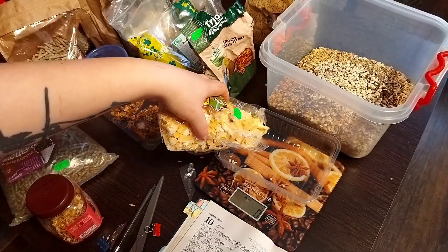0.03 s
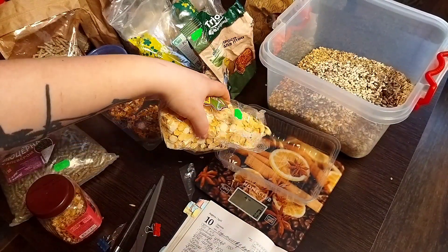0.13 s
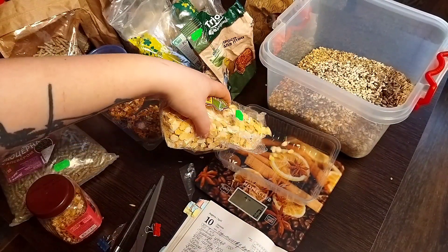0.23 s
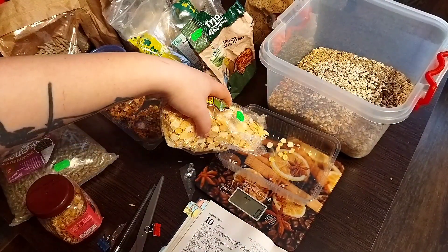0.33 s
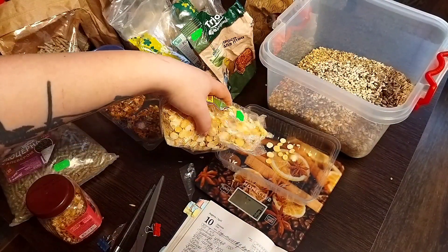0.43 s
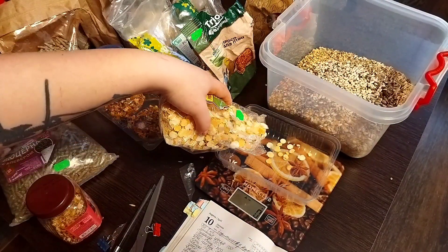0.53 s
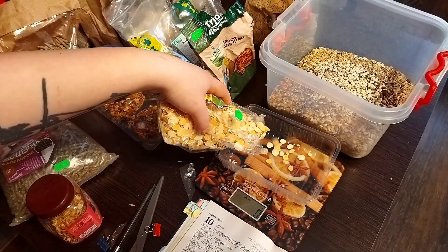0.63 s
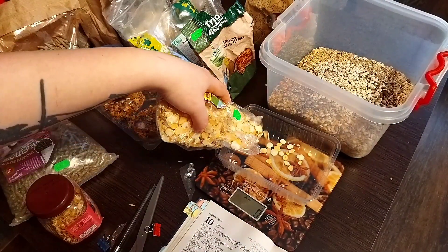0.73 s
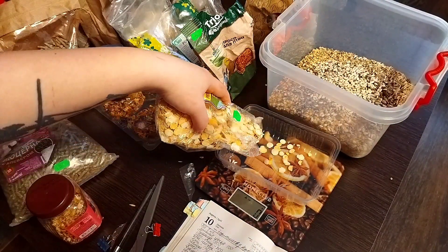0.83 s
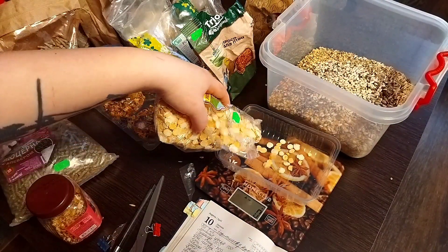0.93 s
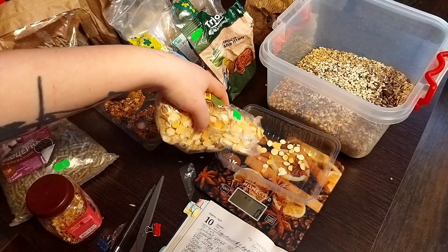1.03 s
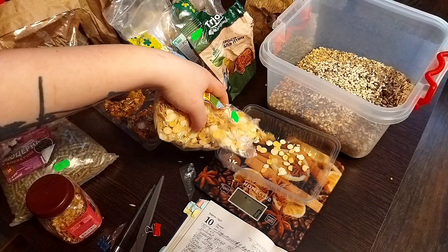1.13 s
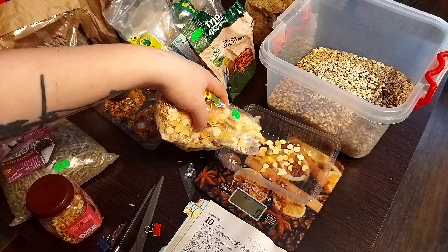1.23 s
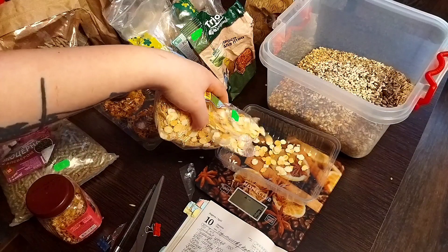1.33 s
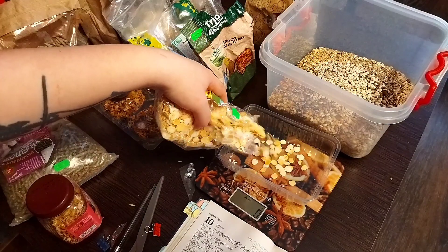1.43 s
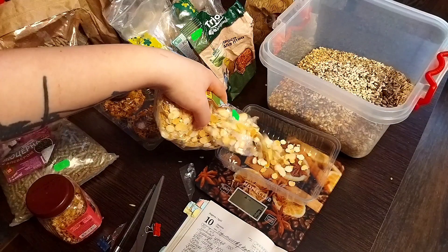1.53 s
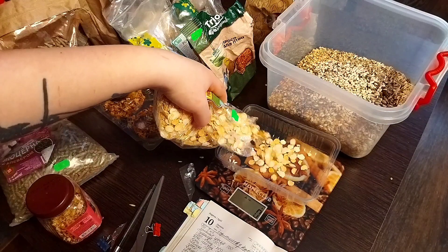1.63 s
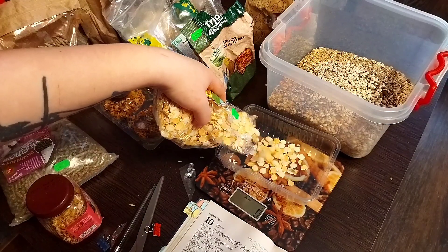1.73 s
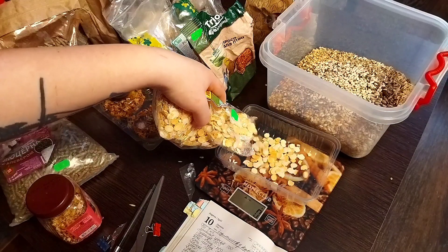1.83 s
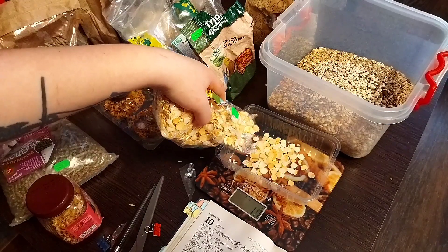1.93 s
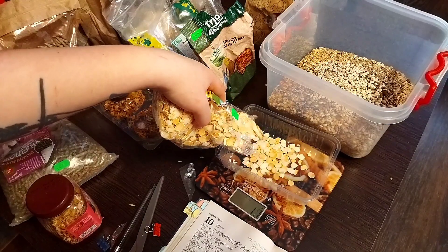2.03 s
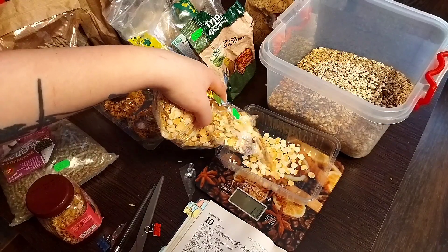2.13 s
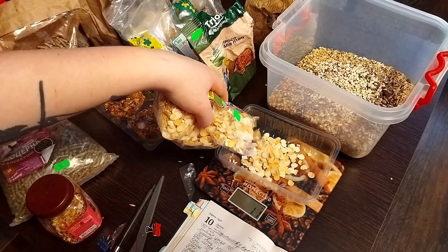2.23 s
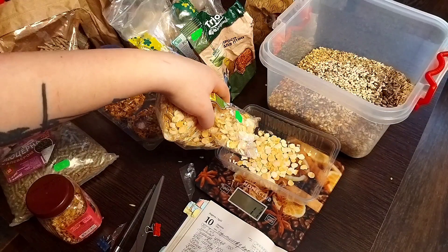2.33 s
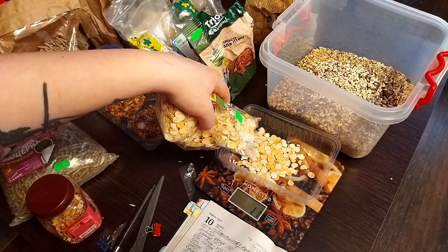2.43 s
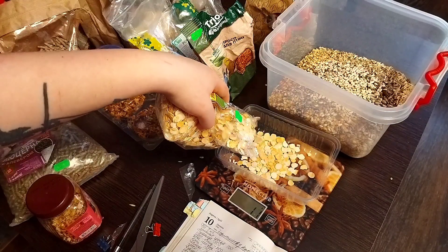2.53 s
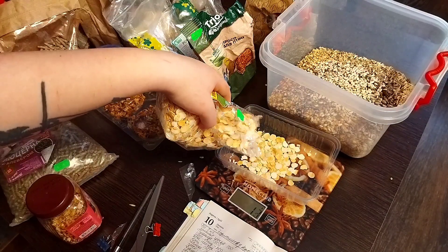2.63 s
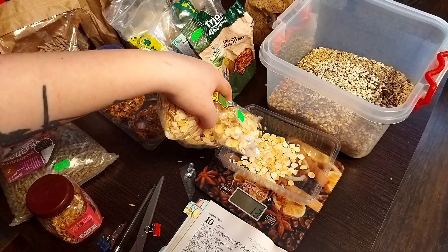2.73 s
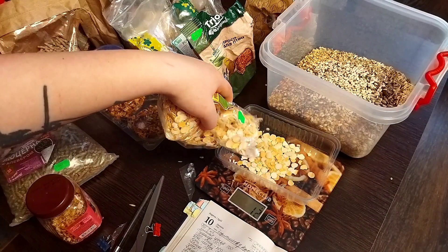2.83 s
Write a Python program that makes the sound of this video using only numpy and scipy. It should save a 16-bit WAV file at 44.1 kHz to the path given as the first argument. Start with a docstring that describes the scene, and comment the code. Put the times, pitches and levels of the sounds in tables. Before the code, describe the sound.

A plastic bag snaps and crinkles in bursts while dry flakes tick into a lightly ringing tray, with a few soft hand bumps; the crackling swells, then fades. Heard close up in a small room with faint hiss.

```python
"""Sharp snaps over a bed of fine crinkles: dry flakes are shaken out of a crinkly plastic bag.
They patter into a thin plastic tray on a kitchen scale and make it ring; the hand gives a few soft bumps.
Snaps, crinkles and flakes are bursts of noise in five ranges; the tray is a set of decaying sines, the bumps
are filtered pushes, and the shifting load and the floor are shaped noise.
Heard from close by through two microphone ports in a small, quiet room."""
import sys
import numpy as np
from scipy import signal
from scipy.fft import rfft, irfft
from scipy.io import wavfile
from scipy.ndimage import uniform_filter1d

SR = 44100
rng = np.random.default_rng(int(sys.argv[2]) if len(sys.argv) > 2 else 0)


def wav_record(signal):
    """Record a signal, one row per channel, as 16-bit PCM in the file named by sys.argv[1]."""
    frames = np.transpose(np.atleast_2d(signal))
    bounded = np.clip(frames, -1, 1)
    # unit amplitude maps onto the largest positive 16-bit level
    quanta = np.round(bounded * 32767).astype(np.int16)
    wavfile.write(sys.argv[1], SR, quanta)


N = 127890
T = np.arange(N) / SR


def from_db(db):
    """Decibels to amplitude gain."""
    return 10 ** (np.asarray(db) / 20)


def rms_one(x):
    """Scale to an rms of one."""
    return x / np.sqrt(np.mean(x ** 2) + 1e-20)


def at_hz(points, hz):
    """Read a table on a log-frequency axis."""
    f, v = np.transpose(points)
    return np.interp(np.log(np.maximum(hz, 1)), np.log(f), v)


def level_curve(points):
    """Level in dB at every sample, straight lines between the points."""
    return np.interp(T, *np.transpose(points))


def bins(size):
    """Frequencies of a spectrum of this many samples, kept above zero."""
    return np.maximum(np.arange(size // 2 + 1) * SR / size, 1)


def causal(gain):
    """Minimum-phase response with these gains: the energy comes as early as it can."""
    cepstrum = irfft(np.log(gain + 1e-6))
    half = len(cepstrum) // 2
    cepstrum[1:half] *= 2
    cepstrum[half + 1:] = 0
    return np.exp(rfft(cepstrum))


def through(x, response):
    """Convolve and keep the length."""
    return signal.fftconvolve(np.atleast_2d(x), response, axes=-1)[:, :N]


def add(out, s, sound):
    """Mix a sound in at a time in seconds."""
    i = max(int(s * SR), 0)
    part = out[:, i:i + sound.shape[-1]]
    part += sound[..., :part.shape[-1]]


# the five ranges of a crack, low to high: low_edge_hz, high_edge_hz, decay_s (time constant), snap_gain_db
CRACK_RANGES = [(53, 998, 0.00095, -1), (936, 1794, .0012, 0), (1730, 2980, 0.00063, -.5),
                (3050, 6560, 0.00095, -0.5), (5560, 15600, 0.0015, -0.5)]
# colour of a crack, before each range is set to its level: freq_hz, gain_db
CRACK_TINT = [(70, -28), (200, -21.5), (280, -11), (580, -8), (770, 3), (1000, -0.5), (1350, 3),
              (1850, -1.5), (2200, 4), (2900, 0.5), (3900, 4.5), (4700, 5), (5500, -6), (7500, -7),
              (10000, -0.5), (15500, -3)]
# how unlike the two ports hear a crack, one share per range, low to high: unlike_share
RANGE_UNLIKE = (0.44, 0.64, 0.55, 0.71, 0.94)
PORT_LAG_S = 0.00005  # the left port hears later
RISE_S, FLUTTER_S = 0.00012, 0.0068  # onset of the small slips; decay time constant of the flutter
FIRST_SLIP_DB = 13.5  # height of the first slip against the noise
CRACK_S = 0.003  # a level is the rms of a crack's energy spread over this time
CRACK_GRIT = 0.85  # unevenness of the tiny slips: 0 smooth, 1 spiky


def cracks(levels_db, flutter_db, size=1024):
    """One stereo crack per row of range levels: a first sharp slip, a run of smaller ones, a faint flutter."""
    count = len(levels_db)
    t, hz, out = np.arange(size) / SR, bins(size), 0
    # three noises per range: one that both ports share, then one for each port alone
    noise = rng.standard_normal((count, len(CRACK_RANGES), 3, size))
    noise *= np.abs(rng.standard_normal((count, 1, 1, size))) ** CRACK_GRIT
    own_colour = facets(count, hz)
    rise = 1 - np.exp(-(t / RISE_S) ** 2)
    flutter = from_db(flutter_db) * np.exp(-t / FLUTTER_S)
    for k, (low, high, decay_s, _) in enumerate(CRACK_RANGES):
        slips = noise[:, k] * rise * (np.exp(-t / decay_s) + flutter)
        slips[:, 0, int(RISE_S * SR)] += from_db(FIRST_SLIP_DB)
        burst = rfft(slips) * own_colour
        unlike = RANGE_UNLIKE[k]
        pair = np.sqrt(1 - unlike ** 2) * burst[:, :1] + unlike * burst[:, 1:]
        pair[:, 0] *= np.exp(-2j * np.pi * hz * PORT_LAG_S)
        band = ((1 + (low / hz) ** 12) * (1 + (hz / high) ** 12)) ** -0.5
        wave = irfft(pair * causal(band * from_db(at_hz(CRACK_TINT, hz))))
        energy = np.mean(np.sum(wave ** 2, axis=2), axis=1)
        level = np.sqrt(energy / (CRACK_S * SR))
        out = out + wave * (from_db(levels_db[:, k]) / level)[:, None, None]
    return out


FACET_LOW_HZ, FACET_HIGH_HZ = 1277, 13800  # span of the pitches that a crease or flake has of its own
FACET_Q, FACET_DB = 9.6, 2


def facets(number, hz, count=4):
    """Short resonances at random pitches, a new set for each crack."""
    own_hz = FACET_LOW_HZ * (FACET_HIGH_HZ / FACET_LOW_HZ) ** rng.random((number, count, 1))
    resonances = 1 / (1 + 1j * FACET_Q * (hz / own_hz - own_hz / hz))
    return 1 + from_db(FACET_DB) * np.sum(resonances, axis=1, keepdims=True)


# the film buckles or a flake hits hard: start_s, five level_db (range by range, low to high, before
# snap_gain_db), left_minus_right_db
SNAP_EVENTS = [(0.1592, -52, -55, -48, -50, -48, -1), (0.22, -33.5, -29, -29, -22, -34, -2),
               (0.2323, -46, -41, -41, -31, -38, -2), (0.247, -45, -31.5, -31, -35, -27, 7.5),
               (0.2649, -50, -42, -44.5, -28.5, -36, -8), (0.2705, -36, -30.5, -40, -22.0, -27, -5),
               (0.2767, -38, -28.5, -28, -25, -23, 1), (0.281, -34.5, -25, -28.5, -23, -24, -2),
               (0.2852, -35, -27, -31, -20, -23, 5.5), (0.316, -40, -25.5, -27.5, -21.5, -24.5, 1),
               (0.3356, -43, -29, -31, -21, -21.5, -2), (0.339, -35.0, -28, -26, -28, -25, -1),
               (0.3563, -50, -34, -37, -26.5, -31, -1), (0.4108, -49, -38, -45, -33, -35, -3),
               (0.4254, -32, -24.5, -26.5, -21.5, -23.5, -0.5), (0.4418, -33.5, -31, -30, -26, -19, -1),
               (0.516, -43, -38, -33.0, -27.5, -38, 0.5), (0.5229, -56, -38.5, -31, -30, -34, -2),
               (0.5494, -60, -39.5, -43, -33.5, -31, 6), (0.5531, -48, -47, -47, -26.5, -25, 0.5),
               (0.5808, -61, -47, -36.5, -39, -35.0, 2), (0.6273, -51, -37.5, -38.5, -25.5, -29.5, 1.5),
               (0.6597, -37, -34.5, -41, -31.5, -32, -1.5), (0.664, -48, -34, -31.5, -44, -27, 2),
               (0.683, -49, -30.5, -31.5, -25.5, -23, 0), (0.7406, -57.5, -48, -31, -30, -39, 2),
               (0.7497, -53, -51, -50, -31, -33.5, -4), (0.7773, -29.5, -24.5, -31, -24, -27.5, 1.5),
               (0.8428, -54.5, -42.5, -42, -33, -35, -4), (0.8595, -37.5, -36, -38, -25.5, -32.5, 1),
               (0.8689, -60, -44, -40.5, -34, -26, 0), (0.8866, -38, -32, -28.5, -18, -20, -2.5),
               (0.8935, -55.0, -33, -31, -22.5, -25, 0.5), (0.8961, -40, -32.5, -31, -26, -31, 5),
               (0.9675, -34, -33.5, -35.5, -21, -25.5, -2.5), (1.0004, -45, -33.0, -38, -37, -39, 1),
               (1.0037, -35.5, -37, -23.5, -27, -24.5, 0.5), (1.019, -30.5, -31.0, -24, -22, -25, 1.5),
               (1.0252, -33, -41, -25, -26.5, -23, 0), (1.1108, -51, -39, -36.5, -28.5, -29.5, -2),
               (1.2439, -54, -32, -28, -26, -31.5, 1), (1.2557, -33, -31.5, -38, -19.5, -29, 2),
               (1.2798, -51, -46.0, -47, -26, -35, -4), (1.2876, -40.0, -32.5, -27, -28.0, -25, 1),
               (1.2908, -42, -37, -24.5, -24.5, -21.5, -1), (1.2955, -32.5, -28.5, -22, -19.5, -23, 2),
               (1.3028, -48, -27, -24.5, -19.5, -27, -4), (1.3149, -53, -33, -31.5, -22.5, -37, 5),
               (1.3241, -38, -34, -36.5, -23, -36, 0), (1.3427, -48, -49, -41, -24.0, -29, 2),
               (1.4559, -36, -32.5, -24, -24.5, -25.5, 1), (1.4899, -42.5, -33, -37, -27, -19, 1.5),
               (1.5007, -42, -27, -29, -21.5, -28, -2), (1.5503, -48, -32.5, -33, -25, -26.0, -3),
               (1.555, -49.0, -29.5, -32.0, -19.5, -22, 5.5), (1.6241, -48.5, -55, -47, -19.5, -32, 0),
               (1.6583, -34, -29.5, -39, -21.5, -29, 1), (1.7044, -35.5, -25.5, -31, -31, -30, -3),
               (1.7128, -37.0, -37, -27, -22, -31, 0), (1.9106, -54, -33.5, -28, -29, -31.0, 0),
               (1.9431, -46, -35, -27.5, -28, -26.5, -2), (2.0257, -31.5, -31.5, -28.5, -24.5, -25, 1),
               (2.0687, -41, -35.5, -30, -32, -26.0, 4), (2.1153, -36, -40, -27, -29.5, -30, -1),
               (2.1226, -58, -41, -32, -30.0, -27.5, 1), (2.171, -41.5, -60, -45, -31, -38, 2),
               (2.2298, -55, -32, -34, -31.5, -29, 2.5), (2.3658, -33, -32, -26.5, -36, -27.5, 0.5),
               (2.516, -37.5, -38, -35.5, -31.5, -32.5, -1.5), (2.6019, -45, -45, -40, -35.5, -32.5, -2),
               (2.6063, -40.5, -37, -36, -24.5, -31, 1.5), (2.706, -46.0, -42, -46.0, -37, -41, 1),
               (2.7327, -50, -38, -51, -35.5, -34.5, 3), (2.8652, -69, -69, -45, -36, -37, 3.5)]


def bag_snaps():
    """The loud single cracks of buckling film and hard-hitting flakes, each leaning to its own side."""
    rows, out = np.array(SNAP_EVENTS), np.zeros((2, N))
    levels_db = rows[:, 1:-1] + np.array(CRACK_RANGES)[:, -1]
    for (s, *_, pan_db), wave in zip(rows, cracks(levels_db, flutter_db=-14)):
        add(out, s - RISE_S, wave * from_db([[pan_db / 2], [-pan_db / 2]]))
    return out


RATE_FOLLOWS = 0.4  # share of a crackle's level swing in dB that its rate follows


def crackle(curve, per_s, spread_db, ranges_db, colour_spread_db, flutter_db, count=80):
    """Tiny cracks of uneven size and colour under a level curve: they come faster when it is louder."""
    colours_db = np.array(ranges_db) + colour_spread_db * rng.standard_normal((count, len(CRACK_RANGES)))
    shapes = cracks(colours_db, flutter_db)
    shapes /= np.sqrt(np.mean(np.sum(shapes ** 2, axis=-1)))
    level_db = level_curve(curve)
    rate = per_s * from_db(RATE_FOLLOWS * (level_db - level_db.mean()))
    sizes = from_db(spread_db * np.minimum(rng.exponential(1, N), 4))
    clicks = (rng.random(N) < rate / SR) * sizes
    # even out the power over 50 ms, so that the curve sets the level
    clicks /= np.sqrt(np.abs(uniform_filter1d(clicks ** 2, size=2205)) + 1e-6)
    clicks *= from_db(level_db) * rng.choice([-1, 1], N)
    dealt, out = rng.integers(0, count, N), np.zeros((2, N))
    for i in np.flatnonzero(clicks):
        add(out, i / SR, clicks[i] * shapes[dealt[i]])
    return out


# fine crinkling as the bag is shaken: time_s, level_db
CRINKLE_LEVEL = [(0, -49.5), (.04, -60.5), (.11, -50), (.21, -63.5), (.28, -33), (.36, -38.5), (.47, -38),
                 (.55, -40), (.61, -53.5), (.67, -34.5), (.73, -45.5), (.83, -47), (.90, -32.5),
                 (.94, -36.5), (1.02, -38), (1.08, -43.5), (1.115, -34), (1.15, -44), (1.23, -46),
                 (1.31, -25.5), (1.37, -34), (1.44, -49.5), (1.50, -33), (1.54, -34), (1.60, -31.5),
                 (1.66, -23.5), (1.74, -32.5), (1.82, -30.5), (1.90, -38), (1.96, -33.5), (2.01, -39),
                 (2.12, -40.5), (2.22, -50.5), (2.24, -29), (2.33, -32.5), (2.41, -33), (2.45, -48),
                 (2.53, -40), (2.59, -61), (2.63, -42), (2.67, -48), (2.71, -43), (2.78, -51), (2.9, -50.5)]
# balance of a crinkle over the five ranges, low to high: level_db
CRINKLE_BALANCE = (-16, -14, -7, -2, -3)


def bag_crinkle():
    """Many small creases of the shaken film give way in a dense bed of tiny cracks."""
    return crackle(CRINKLE_LEVEL, per_s=1200, spread_db=3.5, ranges_db=CRINKLE_BALANCE,
                   colour_spread_db=3.5, flutter_db=-12)


# flakes landing in the tray: time_s, level_db
FLAKE_LEVEL = [(0, -58.5), (.2, -64), (.35, -43.5), (.6, -48.5), (1.05, -48), (1.2, -51), (1.35, -38),
               (1.45, -44.5), (1.7, -40), (1.95, -40.5), (2.2, -61.5), (2.38, -48.5), (2.55, -51.5),
               (2.9, -55.5)]
# balance of a flake's tick over the five ranges, low to high: level_db
FLAKE_BALANCE = (-10.5, -7.5, -4, -0.5, -8)


def flake_patter():
    """Flakes strike the tray in sparser ticks, more varied in size and colour than the crinkles."""
    return crackle(FLAKE_LEVEL, per_s=240, spread_db=4.5, ranges_db=FLAKE_BALANCE,
                   colour_spread_db=7.5, flutter_db=-20)


# modes of the thin plastic tray: pitch_hz, level_db, t60_s
TRAY_MODES = [(482, -50, .16), (750, -55, .07), (840, -57, .08), (1190, -57, .07), (1315, -56, .1),
              (1655, -53, .06), (2120, -54, .04), (3215, -56, .06), (3445, -54, .06)]


def tray(x):
    """The thin walls ring briefly with every tick: each mode is a dying sine, its phase new at each port."""
    t = T[:SR // 4]
    rings = 0
    for hz, db, t60 in TRAY_MODES:
        sine = np.sin(2 * np.pi * (hz * t + rng.random((2, 1)) / 2))
        rings = rings + from_db(db - 60 * t / t60) * sine
    return through(x, rings)


# soft bumps of hand and bag: start_s, peak_db, pitch_hz, width_octaves
BUMP_EVENTS = [(.282, -38.5, 472, 0.17), (.430, -39.5, 423, 0.36), (.491, -37, 290, 0.68),
               (.887, -51.5, 130, 1.1), (1.410, -43, 335, 0.84), (1.498, -42, 347, 0.45),
               (1.566, -39, 350, 0.58), (2.772, -44.5, 335, 0.51)]
BUMP_S = 0.00078  # length of the push


def bumps(size=4096):
    """Dull, quickly damped knocks: a short push through one broad resonance."""
    out, t = np.zeros((2, N)), T[:size]
    push = np.sin(np.pi * np.minimum(t / BUMP_S, 1))
    for s, db, hz, octaves in BUMP_EVENTS:
        resonance = 1 / (1 + (np.log2(bins(size) / hz) / octaves) ** 4)
        wave = irfft(rfft(push) * causal(resonance))
        add(out, s - BUMP_S, from_db(db) * wave / np.abs(wave).max())
    return out


ROOM_LIKENESS_HZ = 645  # above this the two ports hear mostly unrelated noise


def stereo_noise(size):
    """Spectra of diffuse noise: alike at both ports in the bass, unrelated in the treble."""
    mid, side = rfft(rng.standard_normal((2, size)))
    alike = 1 / (1 + (bins(size) / ROOM_LIKENESS_HZ) ** 2)
    return np.sqrt(1 + alike) * mid + np.sqrt(1 - alike) * side * [[1], [-1]]


# dull rustle of the load shifting in the bag: time_s, level_db
LOAD_LEVEL = [(0, -60), (.7, -72), (1.1, -56), (1.22, -57.5), (1.55, -51.5), (1.75, -61.5), (2.1, -61.5),
              (2.6, -68), (2.8, -57), (2.9, -79)]
# its colour: freq_hz, relative_db
LOAD_COLOUR = [(60, -47), (150, -24.5), (220, -9), (280, 2.5), (370, 0.5), (600, 0), (1500, -33),
               (5000, -58)]


def shifting_load():
    """The flakes slide as a mass against the palm: dull noise under a level curve."""
    rustle = rms_one(irfft(stereo_noise(N) * from_db(at_hz(LOAD_COLOUR, bins(N)))))
    return rustle * from_db(level_curve(LOAD_LEVEL))


# reverberation time of the small room: freq_hz, t60_s
ROOM_DECAY = [(200, 0.6), (1000, 0.5), (4000, 0.35), (9000, 0.12), (16000, 0.3)]
# share of the reverberation: freq_hz, level_db
ROOM_SHARE = [(200, -6), (1000, -3), (4000, -6.5), (9000, -12.5), (16000, -8.5)]
ROOM_BUILD_S = 0.00063


def room(x, size=22050):
    """A dense noise tail that builds within milliseconds and dies at its own pace in each band."""
    t, hz, noise, tail = T[:size], bins(size), stereo_noise(size), 0
    centres = np.array(ROOM_DECAY)[:, 0]
    for (_, t60), weights in zip(ROOM_DECAY, np.eye(len(centres))):
        shape = (1 - np.exp(-(t / ROOM_BUILD_S) ** 2)) * from_db(-60 * t / t60)
        band = at_hz(np.c_[centres, weights], hz) * from_db(at_hz(ROOM_SHARE, hz))
        tail = tail + irfft(noise * band) * shape / np.sqrt(2 * np.sum(shape ** 2))
    return through(x, tail)


# colour of the quiet room: freq_hz, relative_db (per Hz)
FLOOR_COLOUR = [(25, -12), (45, -12), (75, -6), (130, -2), (190, -5), (300, -8), (600, -1.5), (1500, 5.5),
                (5000, -11), (16000, -5.5)]
FLOOR_DB = -52.5
FLOOR_UNLIKE = 2.6  # noise that each port has alone, against the diffuse noise


def floor():
    """Faint steady room noise, mostly separate at each port."""
    noise = stereo_noise(N) + FLOOR_UNLIKE * rfft(rng.standard_normal((2, N)))
    return from_db(FLOOR_DB) * rms_one(irfft(noise * from_db(at_hz(FLOOR_COLOUR, bins(N)))))


BAG_INTO_TRAY_DB = -2  # share of the bag's sound that shakes the tray


def scene():
    """Bag, flakes and tray close by, in the small room."""
    crinkle = bag_crinkle()
    flakes = flake_patter()
    bag = bag_snaps() + crinkle
    near = bag + flakes + bumps()
    ringing = tray(flakes + from_db(BAG_INTO_TRAY_DB) * bag)
    return near + room(near) + ringing + shifting_load() + floor()


# resonances of the two microphone ports: freq_hz, width_octaves, left_db, right_db
PORT_RESONANCES = [(930, 0.1, -7, 0.5), (1480, 0.19, 0.5, -2.5), (2877, 0.013, 4.5, -15.5),
                   (3600, 0.011, 1, -4), (6560, 0.12, 4.5, 5), (8770, 0.096, 8, 0), (12100, 0.019, -3, 4.5),
                   (11930, 0.023, 1, -1)]
PEAK_TOP, CUTOFF_HZ = 0.85, 15900  # full-scale ceiling of the rounded peaks; top of the treble


def record(dry, size=2048):
    """Each port adds its own resonances; the highest peaks are rounded and the top is cut."""
    hz, colour_db = bins(size), 0
    for f, width, *sides_db in PORT_RESONANCES:
        bell = np.exp(-0.5 * (np.log2(hz / f) / width) ** 2)
        colour_db = colour_db + np.outer(sides_db, bell)
    ports = np.array([irfft(causal(from_db(side_db))) for side_db in colour_db])
    heard = through(dry, ports)
    heard = heard / (1 + (heard / PEAK_TOP) ** 4) ** 0.25
    return irfft(rfft(heard) / (1 + (bins(N) / CUTOFF_HZ) ** 120))


dry = scene()
out = record(dry)
wav_record(out)
```